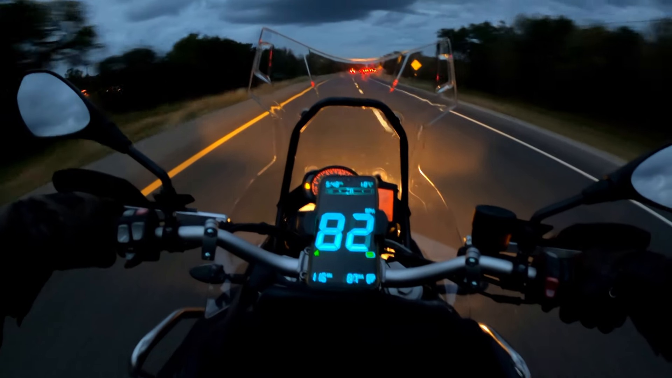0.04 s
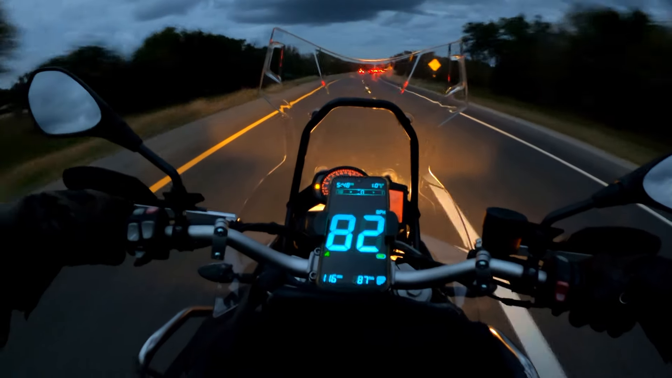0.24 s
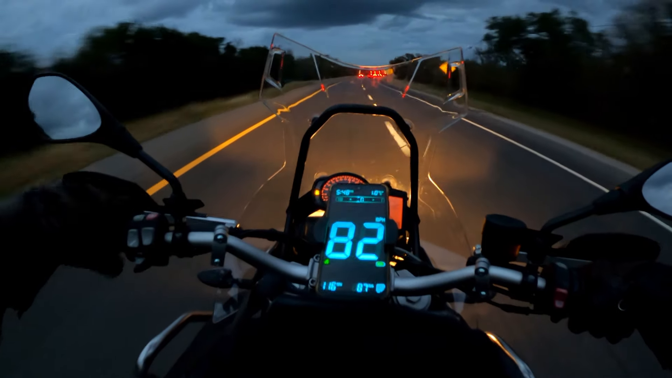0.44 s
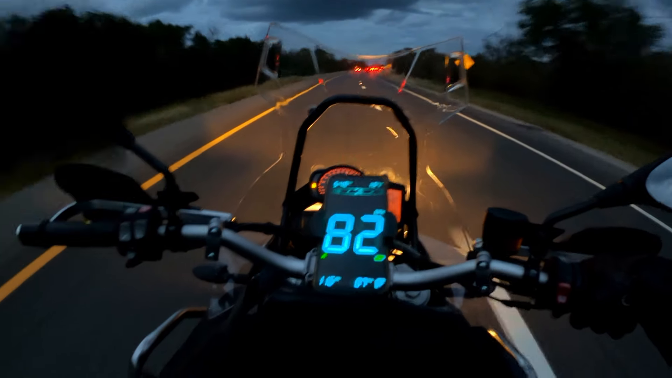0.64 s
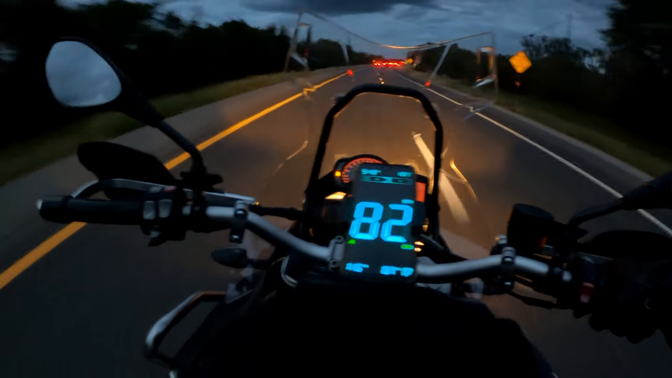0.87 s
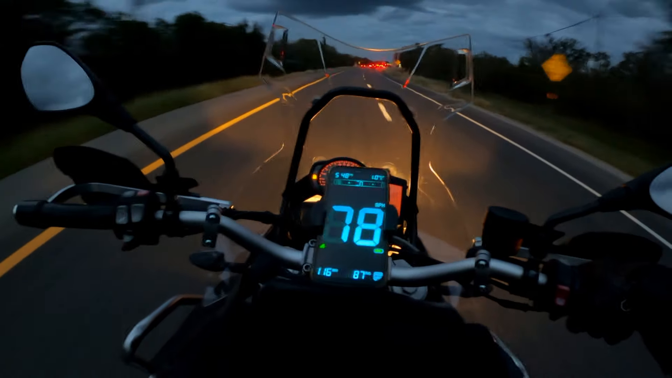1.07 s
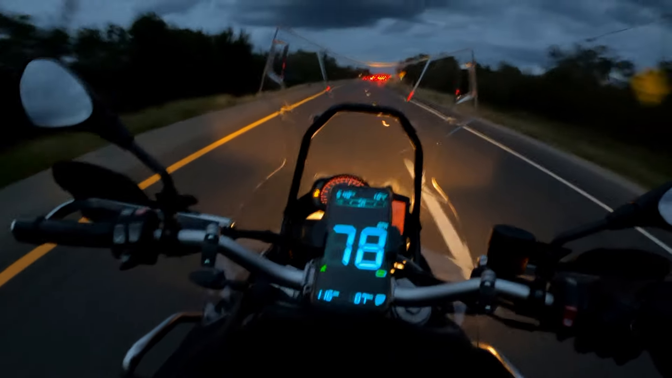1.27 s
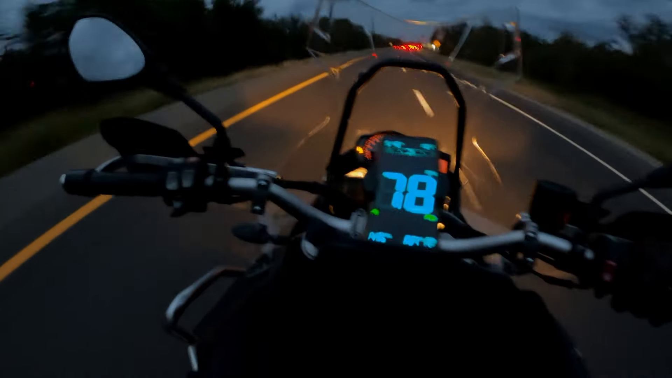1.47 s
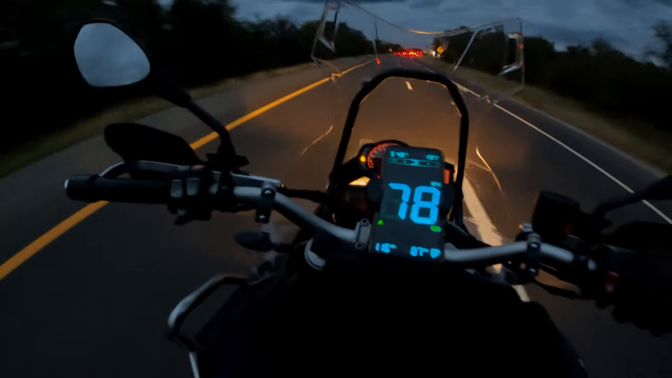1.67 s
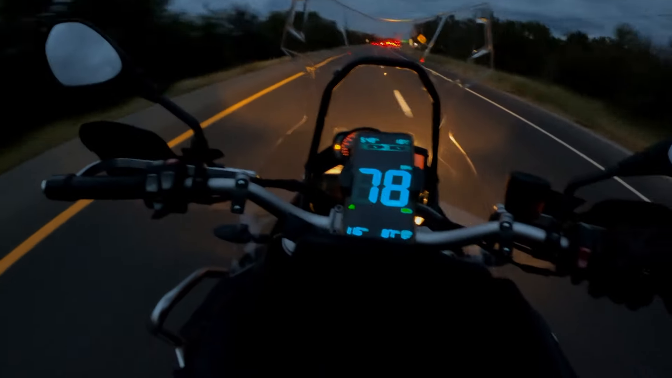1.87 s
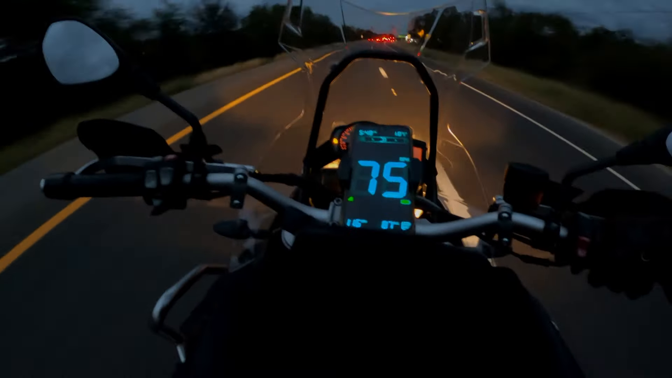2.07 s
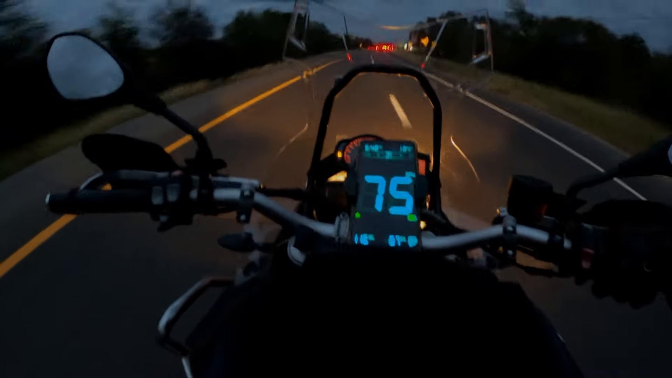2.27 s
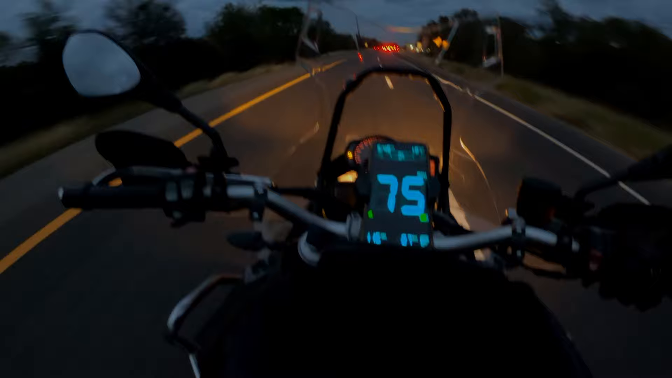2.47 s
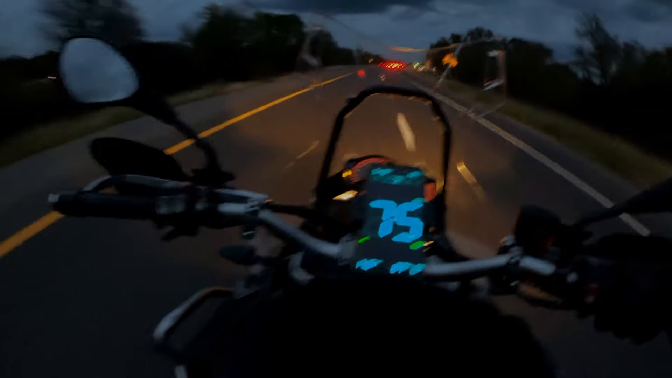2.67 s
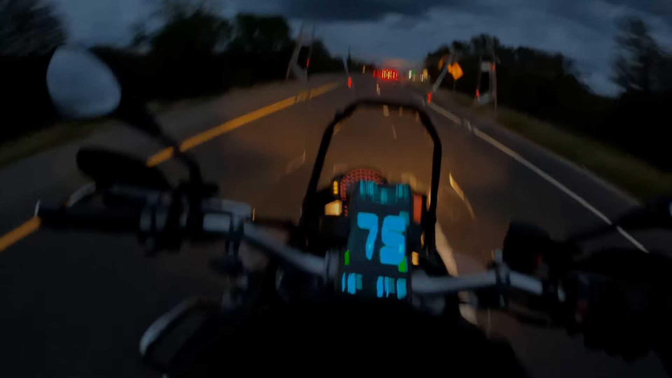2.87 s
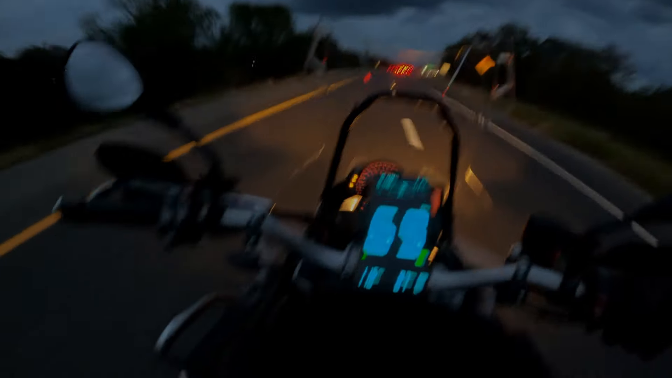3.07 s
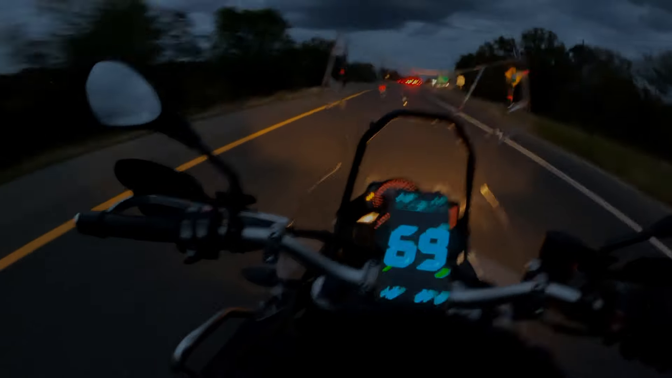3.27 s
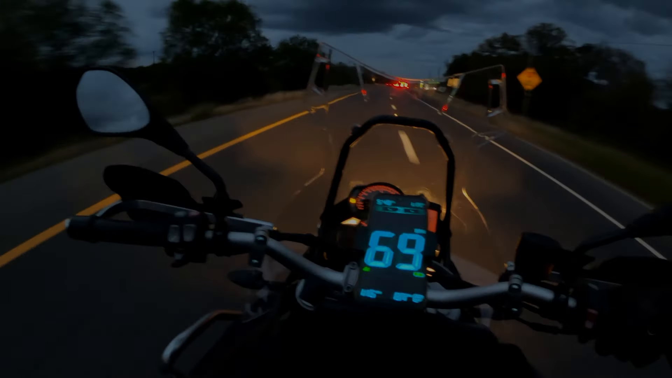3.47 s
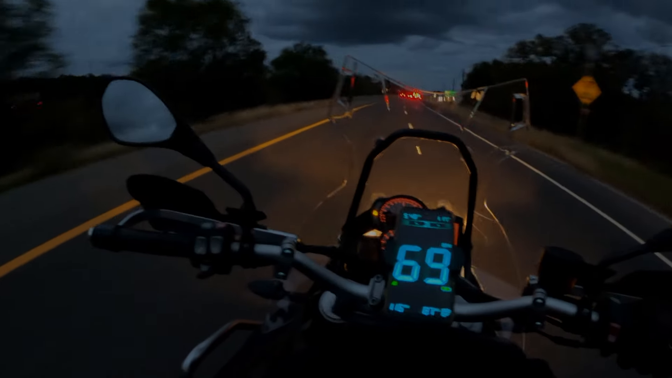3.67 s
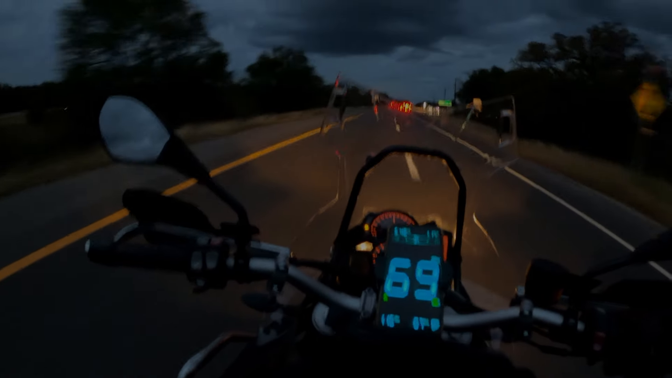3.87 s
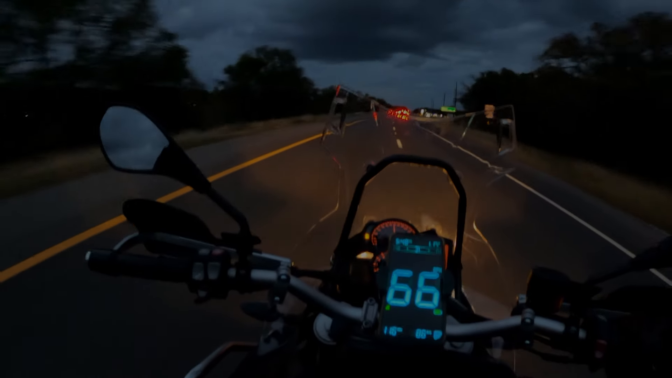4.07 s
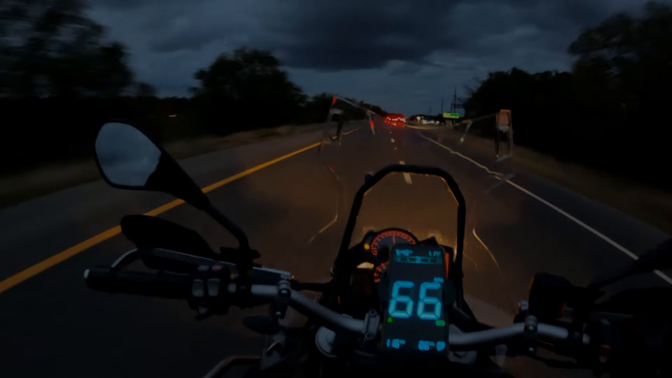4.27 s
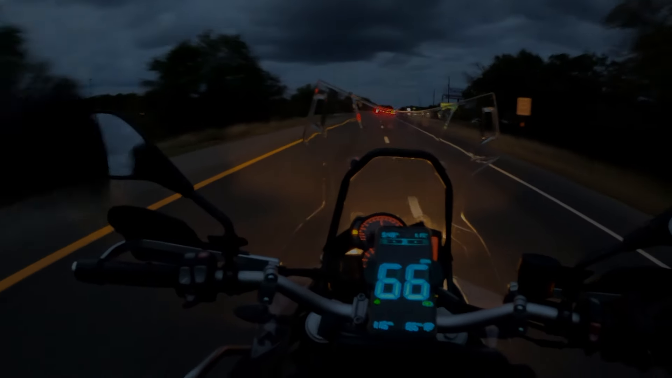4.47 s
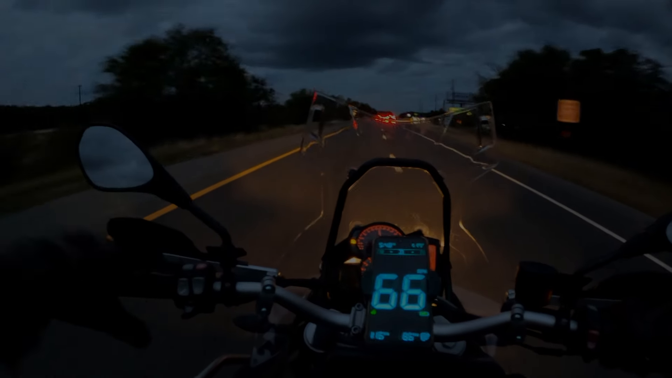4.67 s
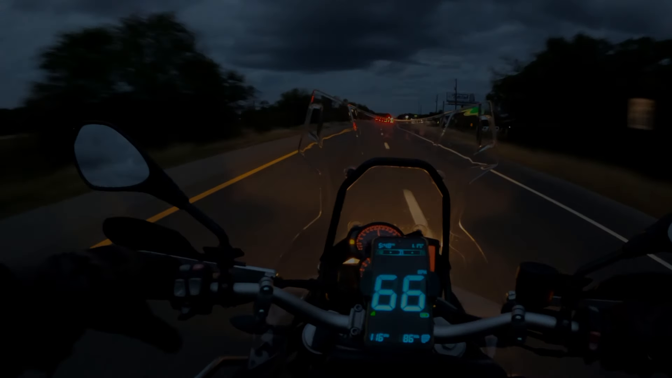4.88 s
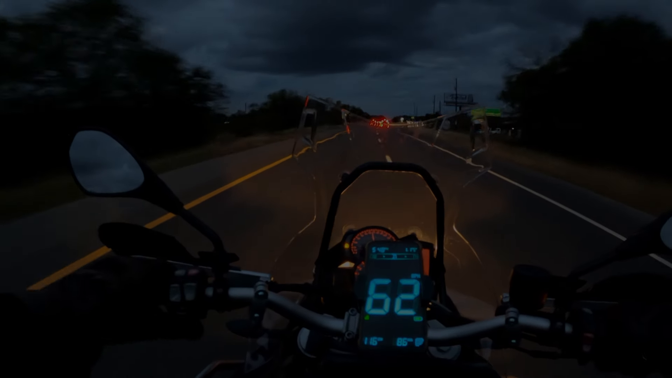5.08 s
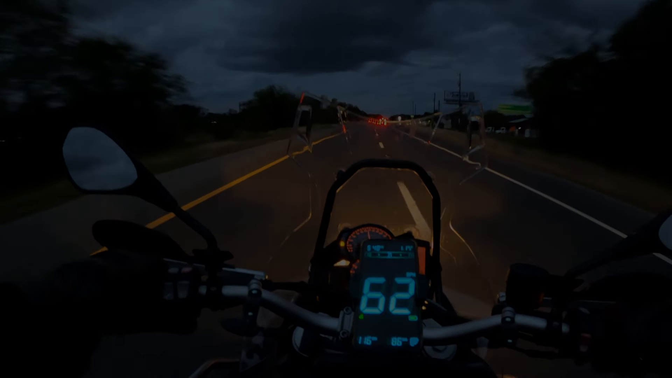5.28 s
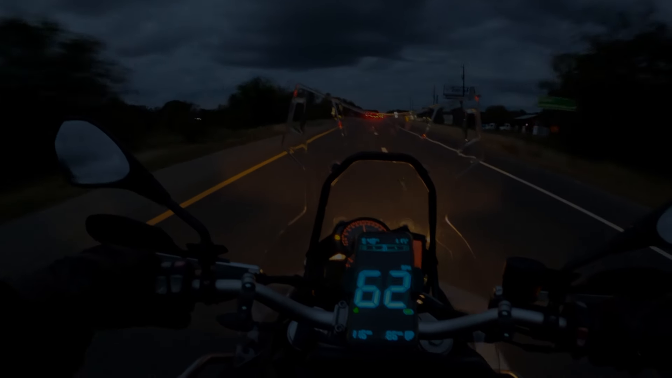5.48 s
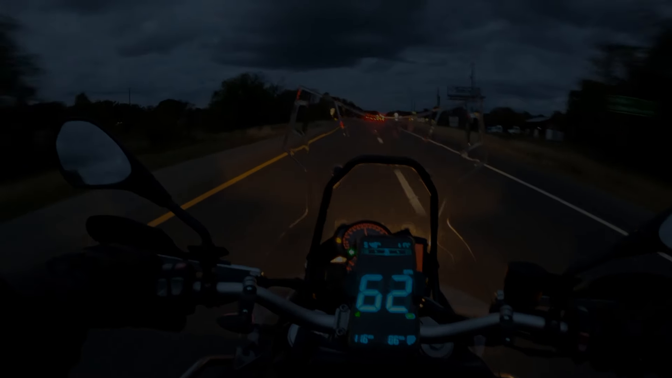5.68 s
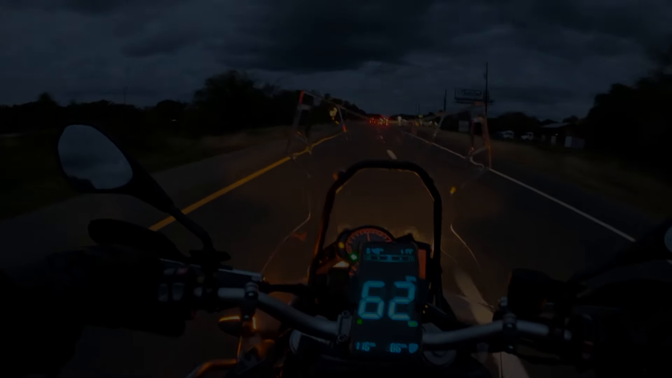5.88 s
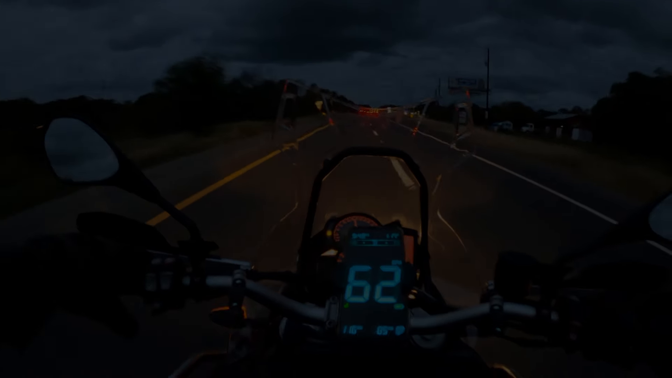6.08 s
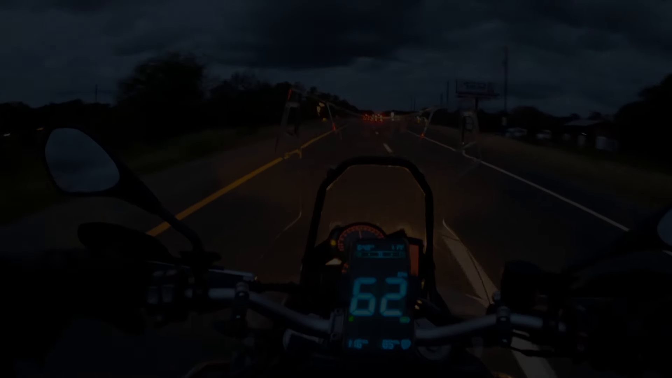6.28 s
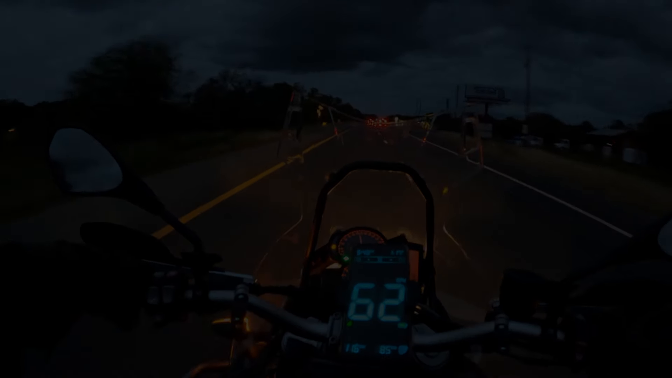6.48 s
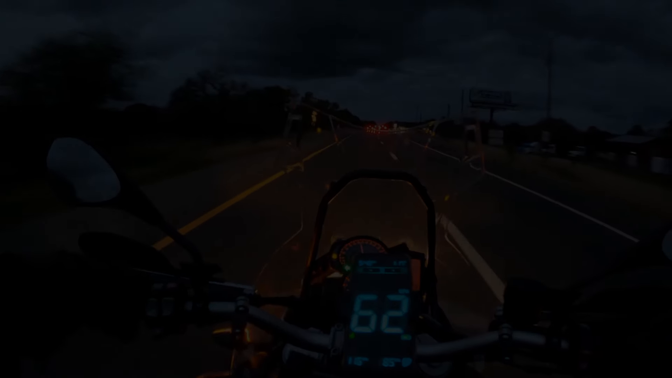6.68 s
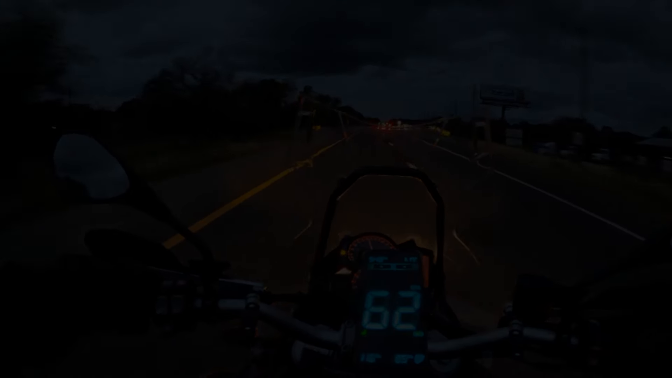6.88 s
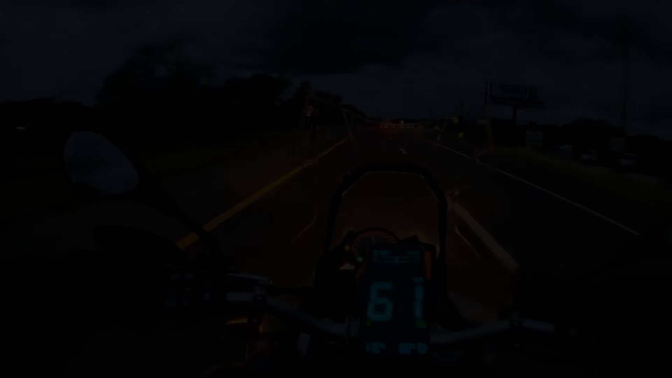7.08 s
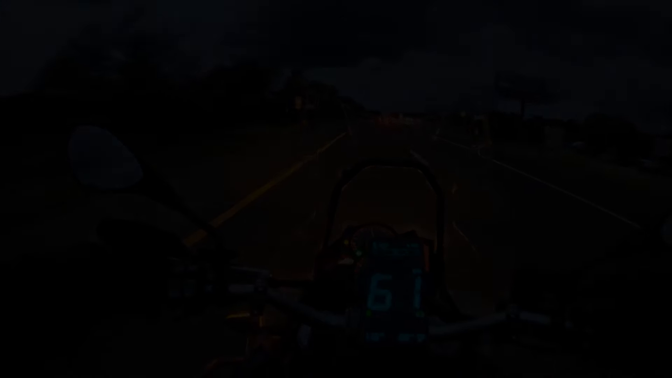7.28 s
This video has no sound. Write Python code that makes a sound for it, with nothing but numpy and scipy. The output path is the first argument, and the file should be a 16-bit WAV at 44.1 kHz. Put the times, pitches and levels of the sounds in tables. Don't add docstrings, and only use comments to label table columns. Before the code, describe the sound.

The sound begins abruptly, already under way, with loud wind on a small rider-mounted microphone. Deep rumble and low flapping carry most of the weight, with a rough mid roar and ragged hiss above, shaking within milliseconds. From 0 to 0.6 seconds a low, slightly uneven twin-cylinder growl rises, strongest near 0.4, then drops away as the throttle closes; by about 2 seconds it is buried. Sharp bursts and slaps come around 0.5, 1.5, 2.2, 3.1 and 4.1 seconds, separated by tiny hollow lulls and duller moments near 0.9 and 2.5. Small dry snaps flick past, mostly early. A very faint tyre rustle fills the gaps. After 5 seconds the slow rumble weighs more, with hiss still spitting through. Loudness falls steadily throughout, ending near 7.3 seconds as a faint, fluttering remnant. Outdoors, close and dry, peaks softly rounded and treble dulled.

```python
import sys
import numpy as np
from scipy import signal
from scipy.fft import next_fast_len
from scipy.io import wavfile
from scipy.ndimage import uniform_filter1d

SR = 44100
rng = np.random.default_rng(int(sys.argv[2]) if len(sys.argv) > 2 else 0)


def invert_db(x):
    u = np.asarray(x, float) / 20
    return 10 ** u


def transcribe(u):
    v = np.clip(np.atleast_2d(u).T, -1, 1)
    q = np.round(v * 32767).astype(np.int16)
    wavfile.write(sys.argv[1], SR, q)


N = 323694


def rms_one(x):
    return x / np.sqrt(np.mean(x ** 2) + 1e-20)


def in_time(rows):
    s, *columns = np.transpose(rows)
    return [np.interp(np.arange(N) / SR, s, column) for column in columns]


def at_hz(points, hz):
    table_hz, *columns = np.transpose(points)
    return [np.interp(np.log(hz), np.log(table_hz), column) for column in columns]


def filtered(x, order, hz, kind="low"):
    return signal.sosfilt(signal.butter(order, hz, kind, fs=SR, output="sos"), x)


def filtered_in_place(x, order, hz, kind="low"):
    return signal.sosfiltfilt(signal.butter(order, hz, kind, fs=SR, output="sos"), x)


def drift(rate_hz):
    hop = 20
    memory = np.exp(-2 * np.pi * hop * rate_hz / SR)
    run_in = 2000
    noise = rng.standard_normal(N // hop + run_in + 2)
    slow = signal.lfilter([1], [1, -2 * memory, memory ** 2], noise)[run_in:]
    return np.interp(np.arange(N) / hop, np.arange(len(slow)), rms_one(slow))


def capped(x):
    return 2.7 * np.tanh(x / 2.7)


def bumps_db(rows):
    ms = np.arange(0, 1000 * N / SR + 1)
    bumps = sum(db * np.exp(-0.5 * ((ms - 1000 * s) / width) ** 2) for s, db, width in rows)
    return np.interp(np.arange(N) * 1000 / SR, ms, bumps)


def fade():
    fade_end_s = 7.917
    return np.clip(1 - np.arange(N) / SR / fade_end_s, 0.01, 1)


# (time [s], level [dB], width [ms])
BURST_HITS = [(0.317, 4, 21), (0.536, 3, 15), (0.623, 2, 3.2), (0.716, 8, 2.7), (1.219, 2.5, 15),
              (1.378, 4.5, 2.7), (1.443, 4.5, 6.1), (1.484, 15.5, 2.7), (1.571, 17.5, 3.3),
              (1.821, 3.5, 24), (1.932, 6, 24), (2.459, -1.5, 3.6), (2.906, 6, 2.5), (3.034, 6, 9.4),
              (3.693, 11.5, 3.2), (4.161, 4, 13), (4.601, 2.5, 3), (4.652, 9.5, 4.1), (4.715, 1, 25),
              (4.974, 12, 4.9), (5.151, 5.5, 9.8), (5.354, 1.5, 26), (5.613, 7.5, 7.7), (5.797, 1, 29),
              (5.977, 7, 2.3), (6.307, 7, 2.6), (6.626, 2, 14), (6.703, 2, 20), (7.014, 4, 8.6),
              (7.217, 8, 9.5)]
# (time [s], level [dB], width [ms])
QUIET_LULLS = [(0.446, -23, 2.3), (0.883, 0, 150), (1.292, -6.5, 5.7), (1.405, -15.5, 4.9),
               (1.543, -7.5, 4.5), (1.632, -5, 6.1), (1.683, 1, 20), (1.883, -3.5, 3.9), (1.972, -5, 9.2),
               (2.154, -6.5, 4.3), (2.539, -2, 11), (2.988, -9.5, 5.3), (3.114, -7.5, 12.5),
               (3.525, -2.5, 6.7), (3.562, -10.5, 5.5), (3.603, -11, 2.5), (3.904, -10.5, 4.2),
               (4.423, -9, 5), (4.577, -9.5, 4.7), (5.059, -6.5, 2.3), (5.101, -6, 3.9), (5.274, -13, 6.5),
               (5.5, -8.5, 8.1), (5.701, -7.5, 6.6), (6.024, -3.5, 13), (6.167, -2.5, 18), (6.74, -11, 3.4),
               (6.803, -3, 3.7), (6.834, -11, 10), (7.045, -9.5, 8.5)]
# (time [s], level [dB], width
# [ms])
MORE_SWIRLS = [(0.213, -14.5, 2.6), (0.243, 4, 3.2), (0.375, -4, 3.8), (0.58, -1, 7.7), (0.807, -4.5, 4.3),
               (1.322, -6, 4.2), (2.079, 2.5, 4), (2.223, 7, 7.2), (2.634, 9.5, 2.8), (2.678, -6.5, 4.8),
               (2.832, -5, 7.1), (3.079, -2.5, 4.9), (3.714, -3, 4), (3.81, 10, 4.7), (3.882, 2, 2.1),
               (3.987, -12, 1.5), (4.281, -1.5, 3.5), (4.312, -4.5, 4.9), (4.374, -5.5, 1.3),
               (4.625, -6, 2.7), (4.808, -6.5, 1.9), (5.413, -9, 3.5), (5.822, -7, 5.5), (6.102, 6, 4.5),
               (6.21, 0.5, 4.4), (6.261, 3, 2.2), (6.287, -5, 6.6), (6.661, 1, 3.5), (6.949, -9, 3.6),
               (6.988, -3.5, 7.5)]
# (time [s], level [dB], width [ms])
LESSER_SWIRLS = [(0.157, -1, 2.3), (0.381, 11, 3), (0.427, 3, 4.7), (0.197, 4.5, 2.3), (0.511, -12, 2.9),
                 (0.741, -5.5, 3.3), (0.86, -0.5, 2.3), (0.929, 8, 1.9), (0.97, -9, 2.7), (1.068, 0.5, 4.9),
                 (1.173, -2.5, 2.7), (1.675, -9.5, 5), (1.724, -4, 3), (1.967, -7, 3.1), (2.041, 10, 5.9),
                 (2.129, 4.5, 3.7), (2.478, -4, 4.7), (2.869, 10.5, 4.4), (2.885, -4.5, 2.9),
                 (3.094, 1, 1.9), (1.162, 10.5, 2.5), (4.017, -10.5, 2.8), (4.251, 9, 2.3), (4.297, 6, 7),
                 (4.314, -7.5, 3), (4.537, -8, 2.9), (4.588, 0.5, 1.7), (4.706, 3.5, 6.6), (4.734, 2, 3),
                 (4.75, -5.6, 3.2), (4.771, 10, 2.8), (4.889, 5, 4.1), (4.934, -5.5, 7.3), (4.988, -7, 1.8),
                 (5.038, 6, 3.9), (5.095, -5, 3.4), (5.114, -0.5, 2.4), (5.242, 1, 5.9), (7.09, 3, 5),
                 (5.346, 6.5, 8.1), (5.398, 5, 2.8), (5.524, 2.5, 2.9), (5.637, -1, 2.7),
                 (5.685, -2.5, 2.8), (5.843, 5.5, 4), (5.946, -6.5, 3.7), (6.027, -17, 3.9),
                 (6.079, -6, 6.3), (6.125, -5, 2.9), (6.153, -15, 3.6), (6.325, -5.5, 5.5),
                 (6.413, -8, 4.1), (6.481, -13.5, 3.2), (6.613, 6, 3.2), (6.663, -6.5, 3.6),
                 (6.711, -3.5, 8.3), (6.82, 8.5, 5.3), (6.884, 4, 2.7), (7.18, -5, 4.7), (7.294, 4.9, 4.5)]


def passing_eddies_db():
    small_db, small_per_s, crowded_out_s = 1.5, 51, 0.0096
    loudest_db, quietest_db = 7.5, 20.5
    strong_db = bumps_db(list(BURST_HITS) + list(QUIET_LULLS) + list(MORE_SWIRLS))
    strong_db = strong_db + 0.79 * bumps_db(LESSER_SWIRLS)
    near_db = uniform_filter1d(np.abs(strong_db), int(2 * crowded_out_s * SR))
    total_db = strong_db + small_db * capped(drift(small_per_s)) * invert_db(-1.5 * near_db)
    limit_db = np.where(total_db > 0, loudest_db, quietest_db)
    return limit_db * np.tanh(total_db / limit_db)


def tears(passing_db, per_s):
    born = rng.random(N) < per_s * invert_db(1.5 * passing_db) / SR
    sizes = invert_db(4 * np.minimum(rng.exponential(1, N), 4))
    signed_sizes = sizes * rng.choice([-1, 1], N)
    return np.pad(invert_db(9) * born * signed_sizes, (SR // 2, 0))


# (frequency [Hz], share of bursts [1], share of lulls [1], shared flutter [dB], own flutter [dB])
FLOW_FEEL = [(58, 0.19, 0.22, 1.76, -0.2), (187, 0.14, 1, 4.5, 0.2), (640, 0.077, 1.73, 2.5, 1),
             (2030, 1.3, 1.46, 3.5, -0.5), (5200, 1.22, 0.97, 3, 0.5), (10100, 1.7, 1.4, 2, 8)]


def turbulence(spectrum, edges, passing_db, flutter, steps=0):
    out = 0
    white = rng.standard_normal((2, N + SR // 2))
    for k, (low_hz, high_hz) in enumerate(zip(edges, edges[1:])):
        band = filtered(white[k % 2] + steps, 2, [low_hz, high_hz], "band")[-N:]
        middle_hz = np.sqrt(low_hz * high_hz)
        burst_share, lull_share, shared_db, own_db = at_hz(FLOW_FEEL, middle_hz)
        share = np.where(passing_db > 0, burst_share, lull_share)
        shake = invert_db(share * passing_db + shared_db * flutter + own_db * drift(33))
        out = out + invert_db(at_hz(spectrum, middle_hz)[0]) * band * rms_one(shake)
    return rms_one(out)


def evened(x, share):
    swell = np.abs(signal.hilbert(x, next_fast_len(N)))[:N]
    return rms_one(x / (swell + 0.097) ** share)


# (frequency [Hz], level per Hz [dB])
SLOW_WIND_COLOUR = [(12, -35), (26, -7.5), (43, -3), (86, -3.5), (123, -1.5), (170, -22.5), (220, -39),
                    (370, -120)]
# (time [s], level [dB], width [ms])
ROLLING_SWIRLS = [(0.1, -7, 15), (0.368, -4, 45), (0.953, -1, 21), (1.05, 6, 26), (0.193, 4, 25),
                  (1.652, -1.5, 100), (1.92, 2.5, 22), (2.07, 6.5, 19), (2.359, 4.5, 160), (2.73, 2, 75),
                  (3.065, 9, 15), (3.505, -11, 18), (3.915, -13, 21), (4.041, 5, 28), (3.76, 5, 60),
                  (4.984, 4, 35), (5.092, -13, 16), (5.159, 9, 12), (5.324, 7.5, 32), (5.637, -4, 15),
                  (5.749, -4, 25), (5.939, 7, 20), (6.045, -8, 19), (6.218, -8, 21), (4.276, 4, 22),
                  (7.218, -5.7, 18)]


def wind_rumble(passing_db, flutter, flow_db, wake_db):
    air = turbulence(SLOW_WIND_COLOUR, np.geomspace(25, 60, 4), passing_db, flutter)
    level_db = -20.5 + 0.22 * flow_db + wake_db + bumps_db(ROLLING_SWIRLS)
    return invert_db(level_db) * evened(air, 0.38)


# (time [s], level [dB], width [ms])
FLAPPING_SWELLS = [(0.144, -23, 18), (0.417, 3.5, 16), (0.9, -4, 8.6), (1.061, -14, 9.7), (1.457, 1, 130),
                   (1.631, -17, 12), (2.057, -3.5, 41), (2.285, 3.5, 32), (2.554, -3, 13), (3.2, -4.5, 21),
                   (3.041, -1.5, 87), (3.482, -19, 18), (3.646, 2, 21), (3.74, 0, 12), (4.211, 2, 32),
                   (4.422, -17, 11), (4.559, -1.5, 31), (5.067, 14.5, 7.3), (5.488, -9, 14),
                   (5.658, 3.5, 82), (5.883, -6, 24), (6.023, -17, 12), (6.167, -9, 16), (6.255, 1, 35),
                   (4.765, -4, 13), (0.604, -5.5, 15), (6.971, -4, 15), (7.263, -8, 11)]


def wind_buffet(passing_db, flutter, flow_db, wake_db):
    air = turbulence(SLOW_WIND_COLOUR, np.geomspace(60, 150, 5), passing_db, flutter)
    level_db = -17.5 + 0.33 * flow_db - 0.21 * wake_db + bumps_db(FLAPPING_SWELLS)
    return invert_db(level_db + 0.079 * passing_db) * evened(air, 0.42)


# (time [s], level [dB])
AIR_FRONTS = [(0.284, 7), (0.614, 5), (1.181, 5), (1.308, 6.5), (1.417, 0), (1.527, 0.5), (1.653, 3),
              (1.898, 3), (2.002, 4.5), (2.221, 8.5), (0.467, 3.5), (2.554, 2), (2.997, 6.5), (3.089, 7),
              (3.573, -1), (3.615, 2), (3.874, 1), (4.108, 9.5), (4.196, 5), (4.321, 3), (4.55, 1),
              (5.071, 4), (5.29, 9), (5.461, -2), (5.522, -1)]


def fronts_db():
    hold_ms, dies_ms = 5, 3.3
    ms = np.arange(N // 10 + 1) * 10000 / SR
    out = np.zeros(len(ms))
    for s, db in AIR_FRONTS:
        after = ms - 1000 * s
        sag = -np.exp(-np.abs(after) / hold_ms)
        slap = np.exp(-np.abs(after) / dies_ms)
        out += db * np.where(after < 0, sag, slap)
    return np.interp(np.arange(N) / 10, np.arange(len(ms)), out)


# (frequency [Hz], level per Hz [dB])
FAST_WIND_COLOUR = [(82, -30), (140, 0), (166, -3), (219, -2.5), (338, -5), (494, -8.5), (1280, -17),
                    (2500, -24.5), (4060, -30), (5600, -37), (7800, -45), (9500, -81), (12000, -77),
                    (15000, -80.5)]
# (time [s], level [dB], width [ms])
ROAR_SWELLS = [(3.096, 3, 8), (0.5, -0.5, 120), (0.85, -5, 75), (1.669, 4.5, 7.4), (1.55, -6.5, 40),
               (1.7, 1.5, 81), (2.12, -12, 21), (2.25, 5.5, 110), (2.8, -2, 72), (3.14, -1, 30),
               (3.3, 3.5, 86), (3.7, -0.5, 130), (5.625, -3, 7.3), (4.9, -5.5, 110), (5.15, 2, 82),
               (5.47, 5.5, 34), (5.7, 4, 37), (6.2, -3.5, 69), (6.626, -8, 8), (7.3, -2.5, 36)]
# (time [s], level [dB], width [ms])
ROAR_THUMPS = [(0.212, -3, 8), (0.143, -8, 23), (0.458, -5, 6.9), (0.546, 12, 6.4), (0.6, -10, 8.1),
               (0.771, 9, 7.4), (1.012, 7, 7), (1.311, 7.5, 8.0), (1.13, 8, 8), (1.709, 4.5, 8.9),
               (2.041, 6.5, 8.4), (2.09, -5, 5.9), (2.339, -7, 19), (2.384, -10, 5.7), (2.706, 6, 7.6),
               (3.123, -12, 12), (3.265, -2, 6.4), (3.523, -5, 5), (1.874, 6, 8), (3.905, -3, 6.1),
               (4.408, -7, 9), (2.262, -11, 8), (4.672, -1, 6.6), (4.847, 4, 7.0), (4.931, 4, 6.4),
               (5.12, -9, 6.1), (5.196, -10, 5.3), (5.446, -11, 8), (5.51, -7, 8.7), (5.664, 1.5, 9.8),
               (5.704, -6, 6.2), (5.923, 2, 6.3), (6.023, -7, 9.5), (6.087, 11.5, 7.9), (6.182, -7, 9.7),
               (6.323, -6, 6.2), (6.483, 6, 6.8), (6.758, 7, 7.5), (7.021, 7, 6.9), (2.404, 5.5, 6.4),
               (2.661, 8.5, 8)]


def wind_rush(passing_db, flutter, steps, fine_db, flow_db):
    air = turbulence(FAST_WIND_COLOUR, np.geomspace(150, 1200, 8), passing_db, flutter, steps)
    roar = filtered_in_place(air, 2, 460)
    roar_db = bumps_db(list(ROAR_SWELLS) + list(ROAR_THUMPS))
    air = invert_db(fine_db) * (air - roar) + invert_db(roar_db) * roar
    return invert_db(-19.5 + 0.19 * flow_db) * air


# (time [s], level [dB], width [ms])
HISS_SPITS = [(0.16, 3, 3.9), (0.46, -4.1, 3.8), (0.514, -11, 3.5), (0.623, 4, 6.6), (0.65, -10, 4.2),
              (0.689, -7.7, 4.3), (0.741, -10, 4.5), (0.86, -5.0, 3.3), (0.905, -5, 6.0),
              (1.331, -5.3, 5.2), (6.77, -5, 4), (1.585, 4.4, 5.2), (1.68, -5, 5.3), (1.876, -5.1, 6.5),
              (2.323, 6, 6.1), (2.37, -7, 4), (2.417, 2.5, 5.4), (2.523, -4.6, 2.8), (2.546, -5, 8),
              (2.566, -2, 3.3), (2.872, -6, 5.4), (3.524, -4.2, 5.8), (6.819, -6, 3.8), (3.888, 4, 4.3),
              (4.363, 9, 3.7), (4.487, 1, 2.6), (4.668, -4.7, 6.2), (4.694, 9, 3.9), (4.339, -5, 4),
              (4.996, 12, 5.3), (5.152, 12, 8.2), (5.73, -5, 4), (5.942, -5.3, 8.0), (5.999, 4.9, 4.7),
              (6.364, 5, 5.1), (6.55, -4.4, 4.0), (6.887, 9, 6.6), (7.108, 3, 10.7), (7.15, -5.2, 6.4),
              (7.182, -5.6, 6.8)]


def wind_hiss(passing_db, flutter, steps, fine_db, flow_db, gust_db):
    air = turbulence(FAST_WIND_COLOUR, np.geomspace(1200, 15000, 17), passing_db, flutter, steps)
    air = invert_db(fine_db) * air
    finest = filtered_in_place(air, 2, 4800, "high")
    finest_db = 0.52 * flow_db + 0.67 * gust_db + bumps_db(HISS_SPITS) + 1.5 * drift(3.9)
    air = air + (invert_db(finest_db) - 1) * finest
    return invert_db(-31.5 + 0.72 * flow_db) * air


# (time [s], level [dB])
AIR_FLOW = [(0.0, 3), (0.49, 0.2), (0.98, 3.5), (1.47, 2.5), (1.96, -0.2), (2.45, 1), (2.94, 2.5),
            (3.42, 2.5), (3.91, 4.5), (4.4, -1.6), (4.89, 0), (5.38, -0.7), (5.87, -3), (6.36, -0.2),
            (6.85, 2), (7.34, -3)]
# (time [s], level [dB])
SCREEN_WAKE = [
    (0, -3),
    (1.0, -0.5),
    (2.2, -1.5),
    (3.0, -2),
    (5.2, 1.5),
    (6.6, 0),
    (7.34, -1),
]
# (time [s], level [dB], width [ms])
AIR_GUSTS = [(0.035, -3, 47), (0.257, 5, 116), (0.26, -7, 57), (0.566, -2, 23), (0.773, 3, 34),
             (0.899, -18, 26), (1.217, 0, 110), (1.635, -9, 103), (2.137, -7.5, 104), (2.548, -20, 21),
             (2.864, 0, 91), (3.249, -7, 37), (3.438, 2.5, 56), (3.791, -8.5, 60), (4.15, 1, 90),
             (4.502, -2.5, 40), (4.837, -2, 40), (5.209, -8, 160), (5.678, -9, 30), (5.826, 3, 43),
             (5.936, -4, 40), (6.788, -21, 42), (6.919, -5, 40), (7.255, -8, 40)]
# (time [s], level [dB], width [ms])
FINE_PUFFS = [(0.041, 0.5, 3), (0.116, -4.5, 6.3), (0.143, -7.5, 6.3), (0.261, -0.5, 7.8),
              (0.379, -7.5, 6.3), (0.457, -7, 5.8), (0.606, -8, 3.9), (0.634, 4, 4), (0.795, -8.5, 3.1),
              (5.428, 2.5, 2.5), (3.226, 0.5, 4.6), (1.067, -5, 5.1), (1.109, 2.5, 12), (1.214, 3, 8.8),
              (1.313, 1.5, 2.1), (1.497, 1, 2.4), (1.27, 3.5, 3.3), (1.347, 2, 2.3), (1.871, -7, 6.7),
              (2.079, 4.5, 4.7), (2.105, -1, 3.5), (2.172, 2.5, 8.9), (2.277, 4.5, 7.2), (2.321, 6.5, 3.4),
              (2.389, -1, 6.4), (2.42, 4, 5.1), (2.464, 9, 4.3), (2.507, 2.5, 5), (2.605, 4, 6.7),
              (2.724, 3.5, 5.9), (2.78, -1, 3.5), (2.822, 4, 4.8), (2.558, 3, 2.9), (2.919, -3, 3.2),
              (2.966, -3, 3.1), (3.016, -5, 3.8), (3.095, 2, 5.7), (3.183, -4, 6.6), (6.71, 6, 4),
              (3.261, -1, 4.6), (3.384, 3, 4.2), (3.44, -2, 4.4), (4.509, 5.5, 4.4), (4.615, 5.5, 3.6),
              (4.879, -4, 4), (3.751, -1, 3.2), (5.201, -4, 4.5), (3.888, 4, 4.1), (5.549, 5, 4),
              (4.028, 3, 4.8), (4.074, 0, 3.7), (4.389, -6, 4.5), (5.074, 5, 4), (5.634, -1, 4),
              (5.92, 5, 4), (5.993, -7, 2.8), (6.235, -14, 4), (6.074, 5.5, 5.6), (6.837, 7, 11),
              (7.316, -5, 11)]


def wind():
    (flow_db,), (wake_db,) = in_time(AIR_FLOW), in_time(SCREEN_WAKE)
    gust_db = bumps_db(AIR_GUSTS)
    flow_db = flow_db + 0.26 * gust_db
    passing_db = passing_eddies_db()
    steps = tears(passing_db, per_s=150)
    flutter = rms_one(0.41 * capped(drift(140)) + 0.49 * drift(303) + 0.17 * drift(650))
    fine_db = bumps_db(FINE_PUFFS) + fronts_db()
    rumble = wind_rumble(passing_db, flutter, flow_db, wake_db)
    buffet = wind_buffet(passing_db, flutter, flow_db, wake_db)
    rush = wind_rush(passing_db, flutter, steps, fine_db, flow_db)
    hiss = wind_hiss(passing_db, flutter, steps, fine_db, flow_db, gust_db)
    return rumble + buffet + rush + hiss


# (time [s], firing rate [per s], level [dB])
ENGINE_RUN = [
    (0, 98, -24.5),
    (.2, 83, -18.5),
    (.4, 95, -17),
    (.6, 82, -24.5),
    (.9, 95, -33),
    (2, 78, -43),
    (4, 56, -55),
    (7.34, 103, -52),
]
# (multiple of firing rate [1], level [dB])
ENGINE_TONES = [(.5, -23), (1, 3), (1.5, -2), (2, -6)]


def engine():
    per_s, level_db = in_time(ENGINE_RUN)
    unsteady_per_s = per_s * (1 + 0.0087 * drift(4.7))
    turn = 2 * np.pi * np.cumsum(unsteady_per_s) / SR
    tones = sum(invert_db(db + 0.5 * drift(13)) * np.sin(k * turn + k * k) for k, db in ENGINE_TONES)
    return invert_db(level_db) * rms_one(tones)


def road():
    rustle = filtered(rng.standard_normal(N), 1, [1500, 5000], "band")
    dull = filtered(rustle, 4, 7500)
    return invert_db(-52.5) * fade() * rms_one(dull)


# (time [s], level [dB])
EDGE_SNAPS = [(0.0762, -34), (0.152, -40), (0.5373, -29.5), (0.5671, -29), (0.752, -37), (1.2664, -35),
              (1.3079, -38), (1.344, -38), (1.4845, -43), (1.927, -44), (2.3042, -36), (2.4892, -38),
              (2.5152, -43), (2.694, -43), (2.7417, -36), (2.9053, -48), (3.0859, -38), (0.2395, -36),
              (3.8731, -39), (4.1061, -45), (4.5984, -53), (4.9013, -43), (5.0379, -54), (5.195, -52),
              (5.15, -45), (5.4645, -53), (5.9813, -54), (6.5585, -54), (5.227, -52), (6.8833, -61),
              (6.9227, -58), (6.9666, -48)]


def snaps():
    dies_s, trim_db = 0.0011, -6
    s, db = np.transpose(EDGE_SNAPS)
    kicks = np.zeros(N)
    kicks[(s * SR).astype(int)] = invert_db(db + trim_db)
    puffs = signal.lfilter([1], [1, -np.exp(-1 / (dies_s * SR))], kicks + 1e-18)
    bright = filtered(rng.standard_normal(N), 2, [3000, 8850], "band")
    return puffs * rms_one(bright)


def scene():
    return (fade() * wind() + engine() + road() + snaps())[None]


def roll_off(x):
    return signal.sosfilt(signal.butter(12, 14950, fs=SR, output="sos"), x)


def record(dry):
    limit = 0.87
    limited = fade() * limit * np.tanh(dry / fade() / limit)
    running = np.pad(limited, ((0, 0), (64, 0)), "reflect")
    port = filtered(running, 4, 11500)[:, -N:]
    return roll_off(port)


dry = scene()
out = record(dry)
transcribe(out)
```